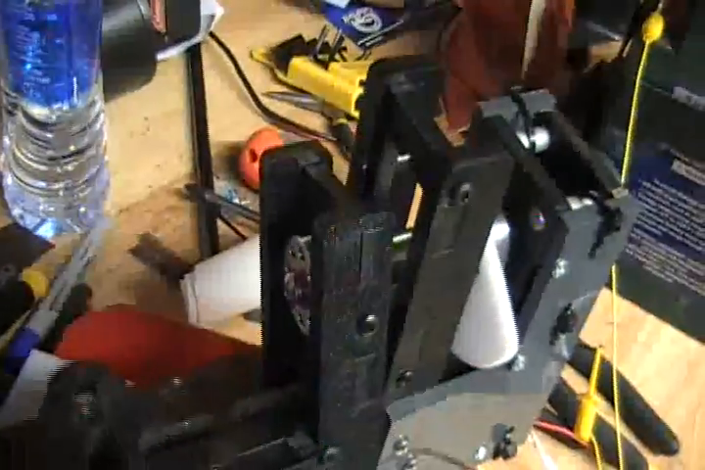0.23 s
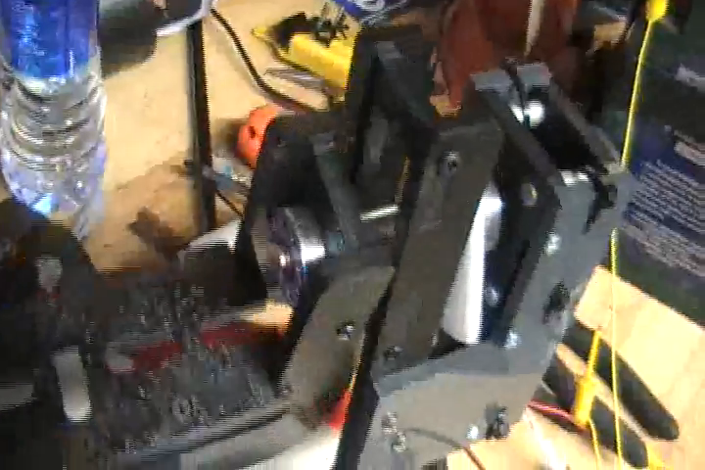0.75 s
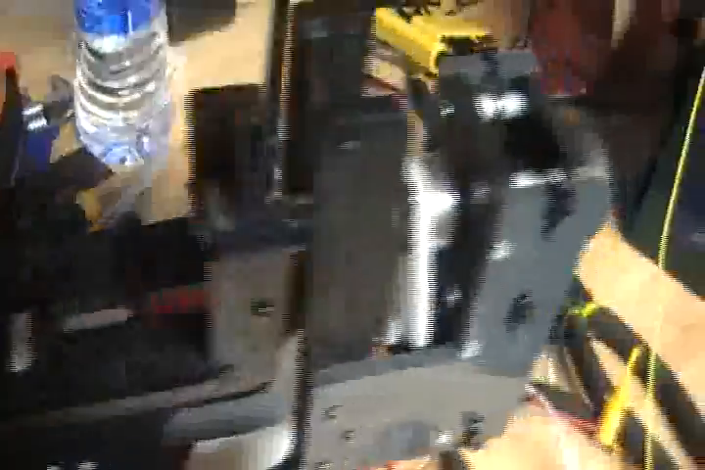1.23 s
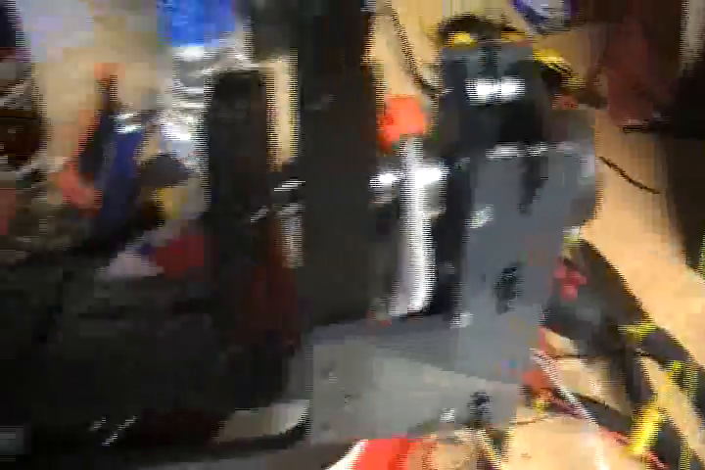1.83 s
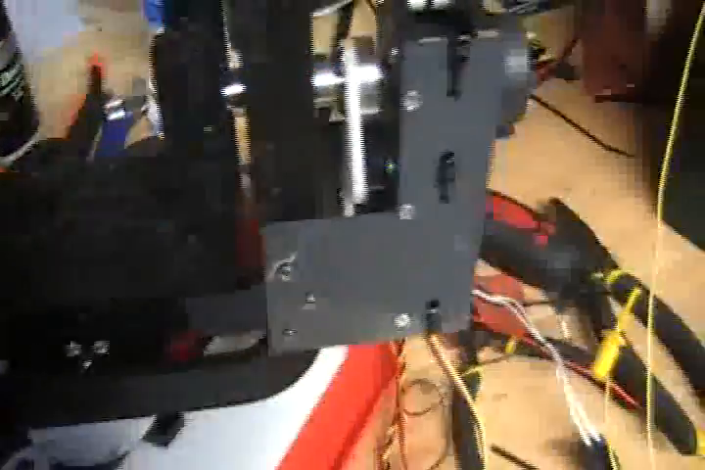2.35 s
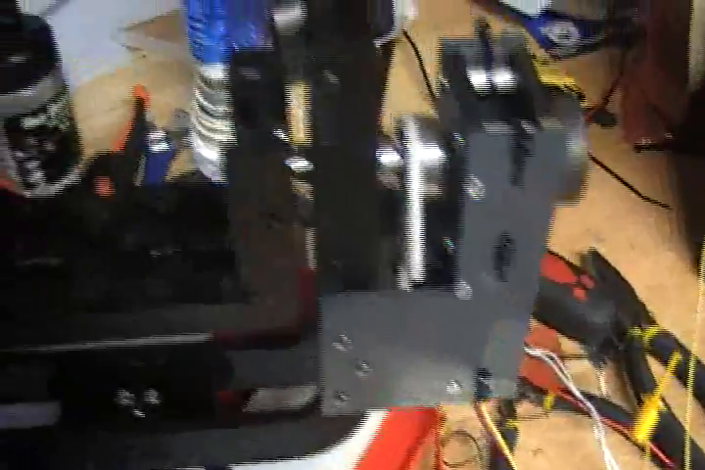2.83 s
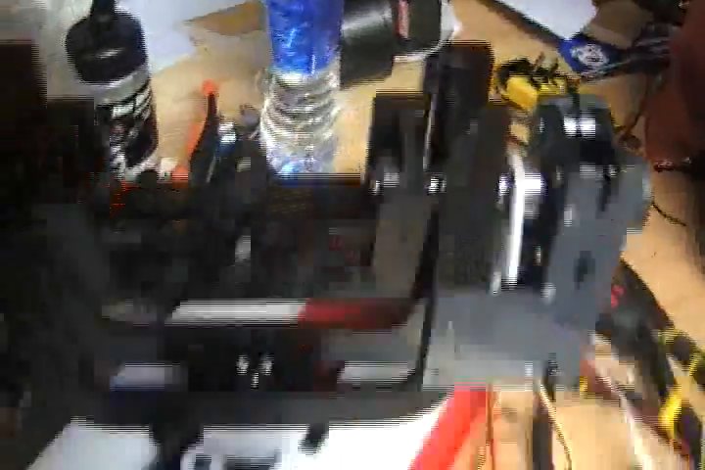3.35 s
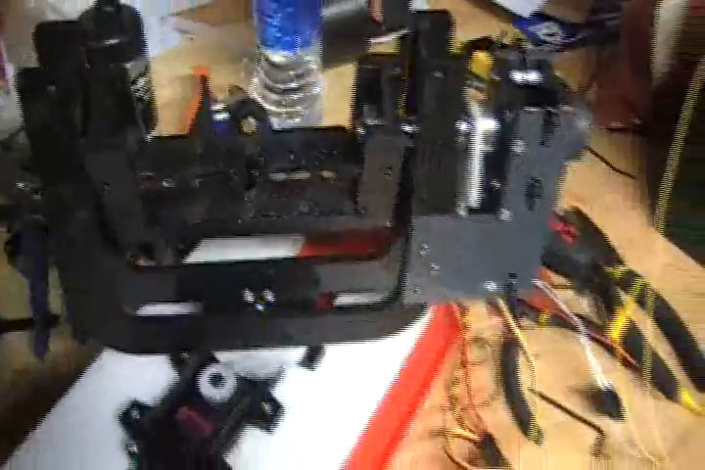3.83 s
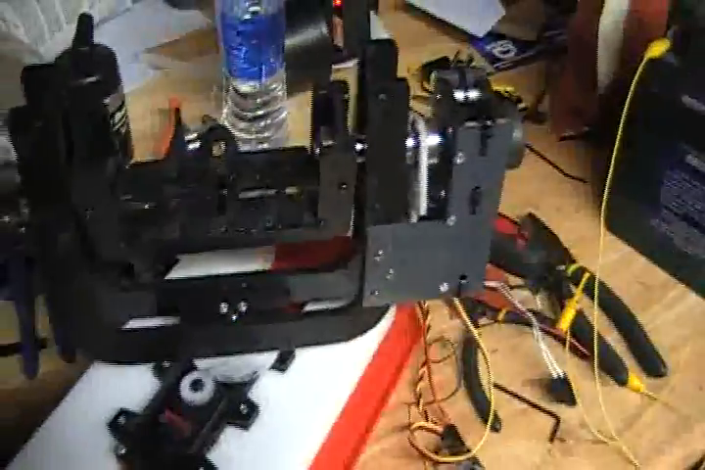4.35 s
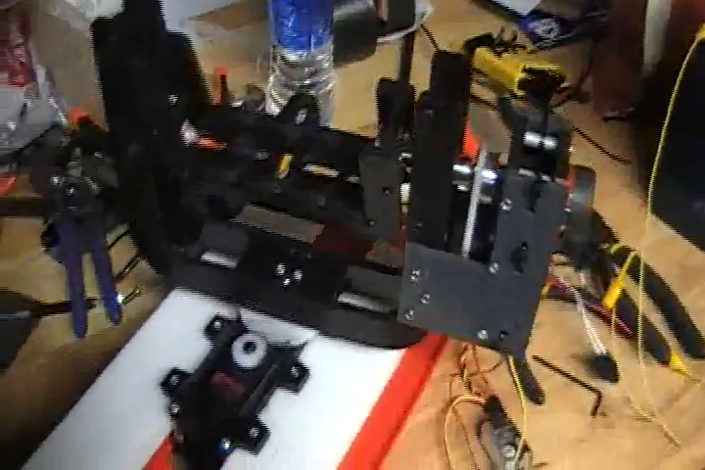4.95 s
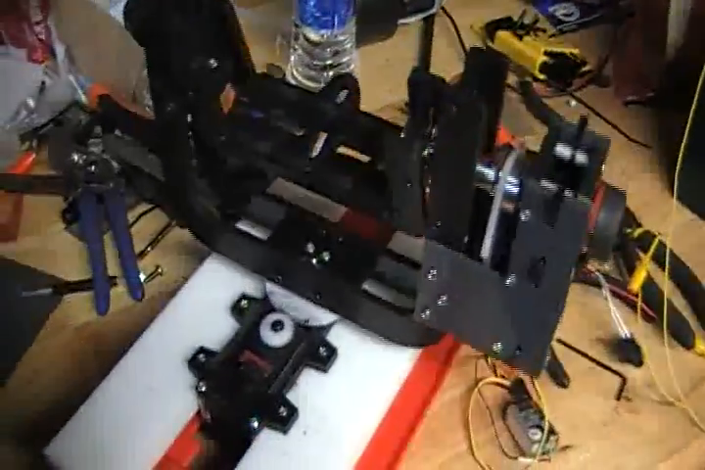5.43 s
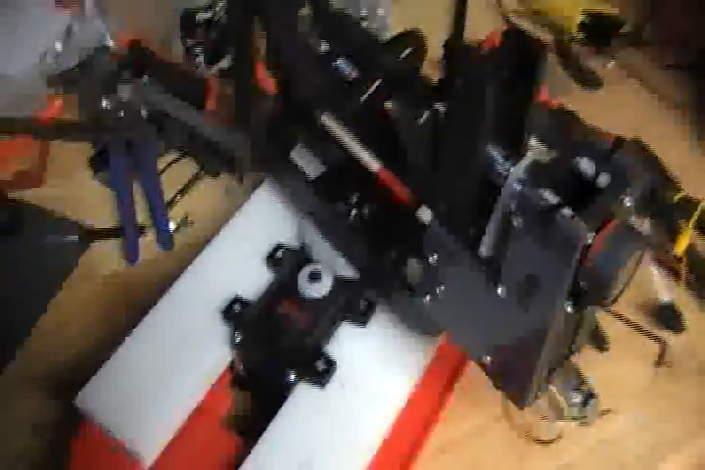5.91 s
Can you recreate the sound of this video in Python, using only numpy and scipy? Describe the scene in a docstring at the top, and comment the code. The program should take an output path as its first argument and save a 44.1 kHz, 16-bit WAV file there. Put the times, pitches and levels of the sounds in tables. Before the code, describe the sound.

A small servo motor whines loudly through two strokes, then rattles and ticks more softly, with light knocks and faint whirring over a low hum.

```python
"""A small servo whines through two full-speed strokes, moving a mount on a workbench.
Its gear mesh radiates harmonics of the shaft speed, and tooth impacts rattle the resonant case.
A second servo creeps on its drive pulses, rattling, ticking and warbling; a farther one whirrs
faintly, and slack in the mount knocks. The servos sound from the centre with a short bench echo,
over a room hum that leans left."""
import sys
import numpy as np
from scipy import signal
from scipy.io import wavfile
from scipy.ndimage import uniform_filter1d

SR = 44100
rng = np.random.default_rng(int(sys.argv[2]) if len(sys.argv) > 2 else 0)


def transcribe(signal):
    """Save signal, clipped to [-1, 1], as a 16-bit WAV file at the path in sys.argv[1]."""
    frames = np.atleast_2d(signal).T
    limited = np.clip(frames, -1, 1)
    pcm = np.round(limited * 32767).astype(np.int16)
    wavfile.write(sys.argv[1], SR, pcm)


N = 272538
T = np.arange(N) / SR
DRIVE_HZ, FIRST_PULSE_S = 50.17, 1.9387  # drive pulses of the creeping servo
# modes of the creeping servo's case: (frequency [Hz], bandwidth [Hz], lift [dB])
CREEP_MODES = [(1965, 43, 5), (2396, 64, 5.5), (2840, 42, 3.2), (3520, 40, 1.54), (5120, 290, 8.1),
               (5540, 59, 14.6), (6030, 75, 6.7), (7010, 170, 4.2), (7280, 260, 5.6)]


def fast_servo():
    """Gear noise depends on direction: the strokes out and back each have their own spectrum."""
    # (start [s], braking [s], stop [s], whine level [dB], full-speed rattle level [dB])
    outward, back = [(-.13, .957, .979, -24, -22.3), (1.027, 1.868, 1.9, -25, -21.5)]
    # shaft harmonics: (order, relative level [dB])
    orders_out = [(1, -22.5), (2, -23), (3, -15), (4, -27), (5, -36.5), (6, -24), (7, -22.5), (8, -16),
                  (9, -9.5), (10, -4), (11, -16.5), (12, -12), (13, 2), (14, -8.5), (15, -17.5),
                  (16, -13.5), (17, 0.5), (18, -17.5), (19, -17.5), (20, 5), (21, -35), (22, -11),
                  (23, -5.5), (24, -4), (25, -12), (26, -6.5), (27, 0), (28, -26.5), (29, -18.5), (30, -6),
                  (31, 3)]
    orders_back = [(1, -17), (3, -18), (4, -27), (6, -17), (7, -23), (8, -15), (9, -13), (10, 0), (11, -19),
                   (12, -11), (13, -3), (14, -9), (15, -14), (16, -13), (17, -8), (18, -20), (19, -18),
                   (20, -4), (21, -17), (22, -14), (23, -13), (24, -9), (25, -2), (26, -3), (29, -7),
                   (30, -1), (31, -3), (35, -5)]
    # case response: (frequency [Hz], relative gain [dB])
    case_out = [(530, -49), (900, -30.5), (1680, -17), (1990, -8), (2300, -26), (2610, -1), (2850, -12),
                (3480, -3.5), (3770, -16.5), (4090, -6.5), (4280, -25), (4640, -4.5), (6410, -7.5),
                (7280, 3.5), (7750, 2), (10100, -33.5), (17000, -120)]
    case_back = [(530, -46), (900, -20.5), (1210, -26), (1310, -18.5), (1690, -20), (1970, -5.5),
                 (2240, -43), (2560, -4.5), (3740, -12.5), (4050, -11.5), (4240, -9), (6020, -5),
                 (6530, -6.5), (7280, 2), (7750, -2.5), (10100, -43.5), (17000, -120)]
    # case modes on the way back: (frequency [Hz], bandwidth [Hz], lift [dB])
    modes_back = [(5050, 200, 4), (6090, 160, 9)]
    return (stroke(outward, orders_out, (case_out,), wobble_rad=.82, throb=.55)
            + stroke(back, orders_back, (case_back, modes_back), wobble_rad=.5, throb=.22))


def stroke(move, orders, case, wobble_rad, throb):
    """Gear noise grows with speed; an eccentric wheel modulates the mesh once per turn."""
    # full speed drifts with the load: (time [s], shaft rate [Hz])
    full_speed = [(0, 199), (.3, 200.5), (.5, 199.6), (.9, 198), (1.2, 198.5), (1.3, 198), (1.5, 199.4),
                  (1.85, 200.6)]
    start, brake, stop, whine_db, rattle_db = move
    window = np.clip(np.minimum(T - start, stop + .045 - T) / .004, 0, 1)
    full_hz = np.interp(T, *np.transpose(full_speed))
    run_up = 1 - .53 * np.exp(-((T - start).clip(0) / .055) ** 1.3)
    brake_hz_per_s, run_out_db_per_s = 1650, 694
    shaft_hz = (full_hz * run_up - brake_hz_per_s * (T - brake).clip(0)).clip(50)
    octaves = np.log2(shaft_hz / full_hz)
    run_out_db = run_out_db_per_s * (T - stop).clip(0)
    thinning_db = 4.5 * ((T - brake) / .01).clip(0, 1)
    whine_db += 21 * octaves - thinning_db - run_out_db / 2
    jolt_db = 7 * np.exp(-((T - start) / .01) ** 2)
    clash_db = 7.5 * ((T - brake) / (stop - brake)).clip(0, 1)
    rattle_db += 10 * octaves + jolt_db + clash_db - run_out_db.clip(0, 24)  # a faint rattle coasts on
    shaft = 2 * np.pi * np.cumsum(shaft_hz * (1 + .001 * drift(40))) / SR
    pinion_teeth, wheel_teeth = 10, 62
    wheel = shaft * pinion_teeth / wheel_teeth
    on, whine = window > 0, np.zeros(N)
    whine[on] = mesh_whine(orders, pinion_teeth, shaft_hz[on], shaft[on], wheel[on], wobble_rad, throb)
    turn = 1 + .15 * np.cos(wheel) + .09 * np.cos(2 * wheel)
    turn += .1 * np.cos(shaft) + .07 * np.cos(3 * shaft)
    gears = coloured(rattle(.94, .5) * turn, *case)
    return window * (gain_of(whine_db) * whine + gain_of(rattle_db) * gears)


def mesh_whine(orders, teeth, shaft_hz, shaft, wheel, wobble_rad, throb):
    """Periodic tooth contact radiates shaft harmonics, which flare as they sweep through a resonance."""
    # case modes: (frequency [Hz], bandwidth [Hz], lift [dB])
    modes = [(2900, 250, 8), (3480, 200, 13), (5100, 300, 8), (6080, 250, 4), (7100, 250, 5)]
    whine, size = 0, len(shaft)
    for k, db in orders:
        nearest_mesh, is_mesh = round(k / teeth), k % teeth == 0  # other orders are sidebands
        wobble = nearest_mesh * (1 if is_mesh else .7) * wobble_rad * np.sin(wheel)
        offset = rng.uniform(0, 2 * np.pi) + .03 * nearest_mesh ** 2 * drift(160, size)
        swell = 1 + throb * is_mesh * np.sin(wheel)  # loudest while the tone falls
        sweep_db = resonance_db(modes, k * shaft_hz) - resonance_db(modes, k * np.median(shaft_hz))
        level = gain_of(db + sweep_db + 1.3 * drift(25, size))
        whine += level * swell * np.sin(k * shaft + wobble + offset)
    return whine / whine.std()


def creep_rattle():
    """Amplitude modulation: each drive pulse kicks the motor, so the rattle throbs and ticks."""
    # rattle envelope: (time [s], level [dB], treble gain [dB])
    envelope = [(1.93, -52, -6), (1.955, -37.5, -0.5), (2.003, -26.5, 1), (2.02, -23, 2), (2.1, -23, 3),
                (2.5, -21, 2.5), (2.62, -21, 1), (2.745, -26, 2), (2.765, -23.5, -5.5), (2.82, -39.5, -3.5),
                (2.88, -34, -17), (2.955, -47, -7), (3.03, -30, -10), (3.05, -25.5, 2), (3.2, -25, 0),
                (3.24, -29.5, -7), (3.295, -35, -8), (3.32, -46, -6), (3.4, -44.5, -11), (3.64, -50.5, -32),
                (3.69, -47, -3), (3.74, -52, -26), (3.85, -56, -26)]
    # case response: (frequency [Hz], relative gain [dB])
    case = [(590, -44), (1000, -18), (1330, -25), (1570, -13.5), (2590, -10.5), (2840, -1.5), (3320, -8),
            (3710, -13.5), (4220, -16), (4600, -19), (5050, -12.5), (5890, -15.5), (6150, -2.5),
            (7110, -2.5), (7750, -1), (10100, -44.5), (17000, -120)]
    window, (level_db, treble_db) = curves(envelope)
    depth = np.clip(.22 + .02 * (-21 - level_db), 0, 1)  # the quieter the rattle, the deeper the throb
    cycle = ((T - FIRST_PULSE_S) * DRIVE_HZ) % 1
    kick = np.exp(-cycle / .42) * np.minimum(cycle / .04, 1)
    gears = window * gain_of(level_db) * (1 - depth + depth * unit_rms(kick)) * rattle(.73, 1.4)
    ticks = pulse_ticks(level_db)
    low, high = (signal.butter(3, 4200, kind, fs=SR, output="sos") for kind in ("low", "high"))
    body = signal.sosfilt(low, gears + ticks)
    treble = signal.sosfilt(high, gain_of(treble_db) * gears + gain_of(-11) * ticks)
    return coloured(body + treble, case, CREEP_MODES)


def pulse_ticks(rattle_db):
    """Impulsive excitation: each drive pulse gives a broadband tick that follows the rattle's level."""
    # loud single ticks: (time [s], level [dB])
    single_ticks = [(1.94, -16.5), (1.9452, -15), (1.9795, -17), (2.007, -20), (2.7279, -10), (2.8413, -24),
                    (2.8553, -20), (2.876, -17), (2.882, -19.5), (2.9144, -37), (2.9977, -26), (3.015, -23),
                    (3.039, -25), (3.0579, -16), (3.0771, -25), (3.112, -13), (3.1333, -11), (3.1733, -16),
                    (3.2528, -14.5), (3.2755, -19), (3.3735, -27), (3.394, -25.5), (3.5126, -37)]
    pulses_s = np.arange(FIRST_PULSE_S, 3.78, 1 / DRIVE_HZ)
    late, size = rng.standard_normal((len(pulses_s), 2)).T
    levels_db = np.minimum(np.interp(pulses_s, T, rattle_db) + 12.5, -23) + 4.5 * size.clip(-2, 1)
    out, t = np.zeros(N), np.arange(400) / SR
    for at, db in list(zip(pulses_s + .0012 * late, levels_db)) + single_ticks:
        impact = .8 * rng.standard_normal(400) + 2.5 * (t == 0)
        out[round(at * SR):][:400] += gain_of(db - 60 * t / .012) * impact
    return out


def creep_whine():
    """Frequency modulation: the speed surges on every second drive pulse, so the mesh tones warble."""
    # slow run: (time [s], mean shaft rate [Hz], level [dB])
    motion = [(2.02, 130, -50), (2.045, 138, -33), (2.12, 156, -33), (2.27, 150, -33), (2.41, 160, -33),
              (2.59, 144, -30), (2.67, 142, -36), (2.74, 140, -36), (2.76, 135, -60)]
    # shaft harmonics: (order, relative level [dB])
    orders = [(10, -18), (13, -14), (20, 3), (34, -3)]
    window, (mean_hz, level_db) = curves(motion)
    surge = np.pi * DRIVE_HZ * (T - 2.046)
    shaft_hz = mean_hz * (1 + .075 * np.cos(surge) + .02 * np.cos(2 * surge - 1) + .012 * drift(70))
    shaft = 2 * np.pi * np.cumsum(shaft_hz) / SR
    swell = .65 + .55 * np.cos(surge - 1)  # loudest as the speed falls
    tones = np.zeros(N)
    for k, db in orders:
        level = gain_of(db + resonance_db(CREEP_MODES, k * shaft_hz) + 2.5 * drift(60))
        tones += level * np.cos(k * (shaft + .015 * drift(350)))
    return window * gain_of(level_db) * swell * tones


def far_servo():
    """Forced vibration: a lumpy rattle rings case and bracket; a faint whine arches with the speed."""
    # (time [s], rattle level [dB], bracket level [dB])
    envelope = [(4.33, -75, -65), (4.356, -31.5, -57), (4.4, -46.5, -56), (4.49, -34.5, -47),
                (4.57, -39.5, -51), (4.63, -36, -40), (4.72, -40, -55), (4.82, -37, -51),
                (4.87, -42.5, -66), (5.07, -47.5, -70), (5.17, -46.5, -66), (5.27, -53, -80),
                (5.54, -37.5, -59), (5.58, -37.5, -44.5), (5.74, -34, -43), (5.89, -36, -43),
                (6.04, -41.5, -42.5), (6.18, -43, -52)]
    # case response: (frequency [Hz], relative gain [dB])
    case = [(710, -31.5), (1200, -7), (1290, -5), (1720, -12), (1900, -4.5), (2040, -22.5), (2370, -6.5),
            (3090, -8.5), (3310, -7.5), (4180, -17), (4280, -14.5), (4810, -4.5), (5670, -8), (6890, -8),
            (7750, -13.5), (10100, -55), (17000, -120)]
    # case modes: (frequency [Hz], bandwidth [Hz], lift [dB])
    modes = [(2300, 100, 6), (2760, 60, 5), (4440, 60, 7), (4640, 60, 6), (5500, 50, 11), (5612, 40, 10),
             (5780, 80, 11), (6100, 200, 7), (6330, 50, 9), (6700, 70, 7), (6900, 60, 7), (7080, 50, 6)]
    # (start [s], fastest [s], end [s], top whine frequency [Hz], whine level [dB])
    moves = [(4.4, 4.6, 4.97, 690, -48), (5.48, 5.74, 6.2, 720, -48)]
    window, (level_db, bracket_db) = curves(envelope)
    gears = rattle(1.56, 1.7)
    out = coloured(window * gain_of(level_db) * gears, case, modes)
    bracket = signal.lfilter(*signal.iirpeak(4975, Q=40, fs=SR), gears)
    out += window * gain_of(bracket_db + 3 * drift(18)) * unit_rms(bracket)
    for start, fastest, end, top_hz, whine_db in moves:
        arch = np.sin(np.pi * np.interp(T, [start, fastest, end], [0, .5, 1]))
        ends_hz = np.where(T < fastest, 520, 470)
        hz = ends_hz + (top_hz - ends_hz) * arch ** 2.4
        cycles = np.cumsum(hz * (1 + .009 * drift(40))) / SR
        level = (arch > 1e-6) * gain_of(whine_db - 10 * (1 - arch) ** 2 + 2.2 * drift(30))
        out += level * np.sin(2 * np.pi * cycles)
    return out


def mount_knocks():
    """Backlash: slack in the mount closes in impacts that rise quickly and decay exponentially."""
    # (time [s], relative level [dB], decay time [ms])
    knocks = [(3.693, -47, 22), (3.795, -43.5, 23), (3.819, -55, 12), (4.323, -33.5, 7.1),
              (4.358, -34.5, 27), (4.379, -33.5, 31), (5.183, -35.5, 15), (5.286, -42, 44),
              (5.368, -38.5, 35), (6.061, -40, 30)]
    # mount response: (frequency [Hz], relative gain [dB])
    mount = [(180, -29), (300, 3), (464, -16), (679, 1.5), (1380, -10), (3380, -9), (4320, -21),
             (7140, -14.5), (7750, -11.5), (10100, -46.5), (17000, -120)]
    out, t = np.zeros(N), np.arange(3000) / SR
    for at, db, decay_ms in knocks:
        envelope = np.minimum(t / .0015, 1) * np.exp(-1000 * t / decay_ms)
        out[round(at * SR):][:3000] += gain_of(db + 2) * envelope * rng.standard_normal(3000)
    return coloured(out, mount)


def bench_echo(x):
    """Early reflections off bench and walls: sparse, dying fast, nearly alike left and right."""
    t, reverb_s = np.arange(6000) / SR, .12
    taps = rng.choice([-1., 1.], (2, 6000)) * (rng.random((2, 6000)) < .05)
    taps *= gain_of(-60 * t / reverb_s) * (t > .002)
    mid, side = signal.oaconvolve(x[None], taps / np.linalg.norm(taps[0]), axes=1)[:, :N]
    return gain_of(-15) * mid + gain_of(-29.5) * side * np.array([[1], [-1]])


def room_hum():
    """Partly coherent stereo noise, louder on the left; narrow bands are heard as fuzzy low tones."""
    # noise spectrum: (frequency [Hz], relative level [dB])
    spectrum = [(15, -44), (25, -18), (50, -5.5), (83, -6.5), (125, -13.5), (231, -3.5), (331, -9),
                (547, -7), (842, -8.5), (1150, -12.5), (1770, -17), (2300, -20), (3000, -29.5), (4200, -35),
                (7600, -33)]
    # fuzzy tones: (frequency [Hz], bandwidth [Hz], relative level [dB])
    bands = [(82, 33, -60), (286, 100, -57), (460, 36, -57), (624, 14, -63)]
    # (frequency [Hz], level of left over right [dB])
    balance = [(60, 6), (160, 6.5), (430, 6), (1130, 3.5), (3020, -1), (8030, -1)]
    # (frequency [Hz], squared coherence of left and right)
    coherence = [(60, 0.84), (160, 0.36), (430, 0.77), (1130, 0.45), (3020, 1), (8030, 0.99)]
    # (frequency [Hz], phase lead of left [rad])
    lead = [(0, 0), (1120, -0.025), (2930, -0.1), (7840, 0.1), (8180, 0.1)]
    frames, hz = N // 512 + 5, np.fft.rfftfreq(2048, 1 / SR)[:, None]
    a, b, c, d, flicker = rng.standard_normal((frames, 1025, 5)).T
    common, separate = a + 1j * b, c + 1j * d
    flicker = unit_rms(uniform_filter1d(uniform_filter1d(flicker, 8, 0), 6, 1))
    tones = sum(gain_of(db + 59.5) ** 2 / (1 + (2 * (hz - f) / width) ** 2) for f, width, db in bands)
    size = gain_of(log_interp(spectrum, hz) + 1.2 * flicker) * np.sqrt(1 + tones)
    shared, lean = log_interp(coherence, hz), gain_of(log_interp(balance, hz) / 2)
    left = common * lean * np.exp(1j * log_interp(lead, hz))
    right = (np.sqrt(shared) * common + np.sqrt(1 - shared) * separate) / lean
    out = signal.istft(size * np.array([left, right]), nperseg=2048, noverlap=1536)[1][:, :N]
    return gain_of(-41) * out / np.std(out.mean(0))


def rattle(spread_db, lumps_db):
    """Random tooth impacts: noise whose size jumps from contact to contact and swells in lumps."""
    return unit_rms(rng.standard_normal(N) * gain_of(spread_db * drift(1300) + lumps_db * drift(78)))


def resonance_db(modes, hz):
    """Lift in dB at hz from Lorentzian resonances that add in power."""
    peaks = ((gain_of(db) ** 2 - 1).clip(0) / (1 + (2 * (hz - f) / width) ** 2) for f, width, db in modes)
    return 10 * np.log10(1 + sum(peaks))


def coloured(x, response, modes=((1, 1, 0),)):
    """Minimum-phase filtering at unit mean power gain: a broad response plus resonances."""
    hz = abs(np.fft.fftfreq(8192, 1 / SR))
    log_gain = np.log(gain_of(np.maximum(log_interp(response, hz) + resonance_db(modes, hz), -80)))
    taps = np.fft.ifft(np.exp(np.conj(signal.hilbert(log_gain)))).real[:4096]
    return signal.oaconvolve(x, taps / np.linalg.norm(taps))[:N]


def drift(rate_hz, size=N):
    """Low-pass random fluctuation of rms 1."""
    span = int(SR / rate_hz)
    return unit_rms(uniform_filter1d(uniform_filter1d(rng.standard_normal(size), span), span))


def curves(rows):
    """A window open over a table's time span, and its columns interpolated in time."""
    times, *columns = np.transpose(rows)
    window = np.clip(np.minimum(T - times[0], times[-1] + .016 - T) / .004, 0, 1)
    return window, [np.interp(T, times, column) for column in columns]


def log_interp(points, hz):
    """Interpolation on a logarithmic frequency axis."""
    f, value = np.transpose(points)
    return np.interp(np.log(hz + 1), np.log(f + 1), value)


def gain_of(db):
    """Amplitude ratio of a level in dB."""
    return 10 ** (np.asarray(db) / 20)


def unit_rms(x):
    """Normalisation to rms 1."""
    return x / np.sqrt(np.mean(x ** 2) + 1e-20)


def scene():
    """Superposition of the centred servos, their reflections and the hum."""
    servos = fast_servo() + creep_rattle() + creep_whine() + far_servo() + mount_knocks()
    return servos[None] + bench_echo(servos) + room_hum()


def record(dry):
    """Band limiting by a linear-phase low-pass filter."""
    low_pass = signal.firwin(801, cutoff=7610, window=("kaiser", 10), fs=SR)
    return signal.oaconvolve(dry, low_pass[None], "same")


dry = scene()
out = record(dry)
transcribe(out)
```